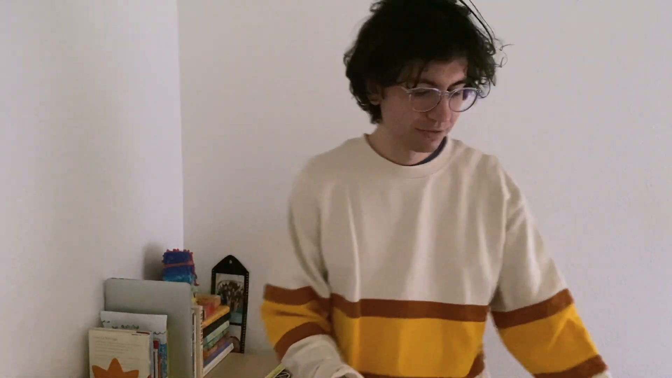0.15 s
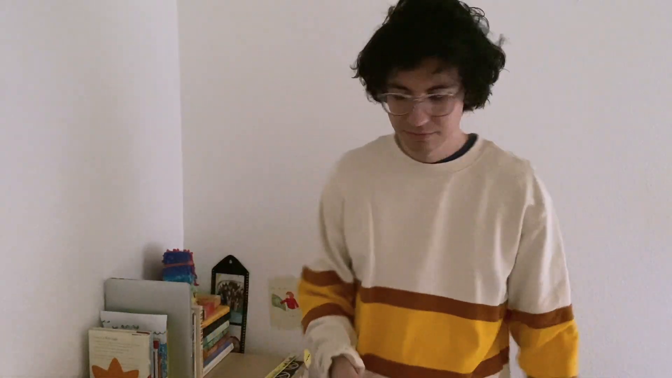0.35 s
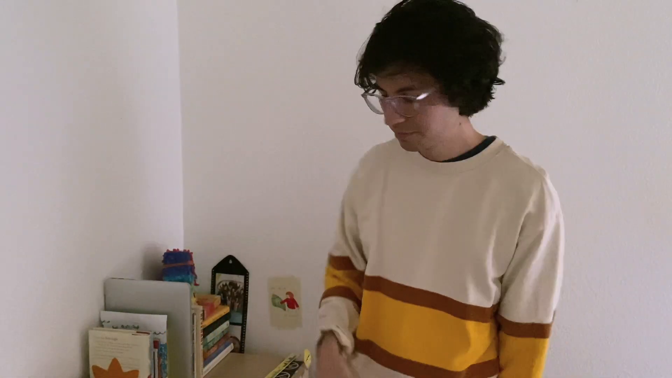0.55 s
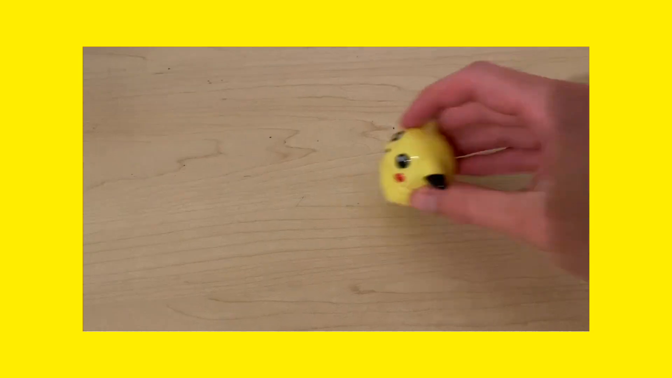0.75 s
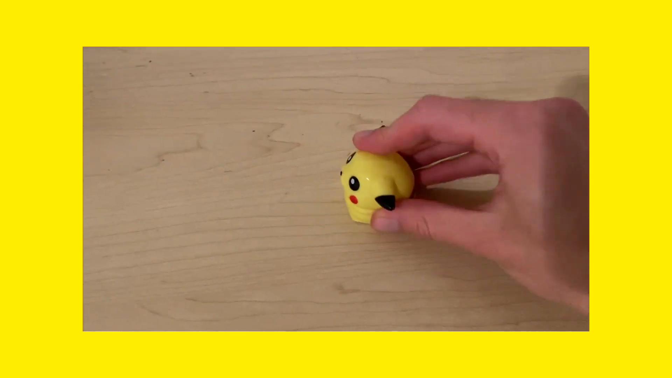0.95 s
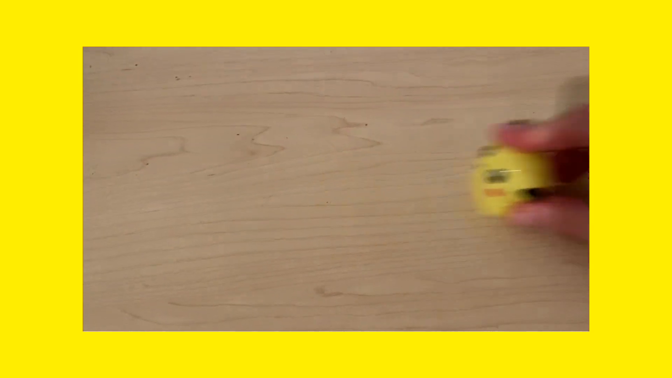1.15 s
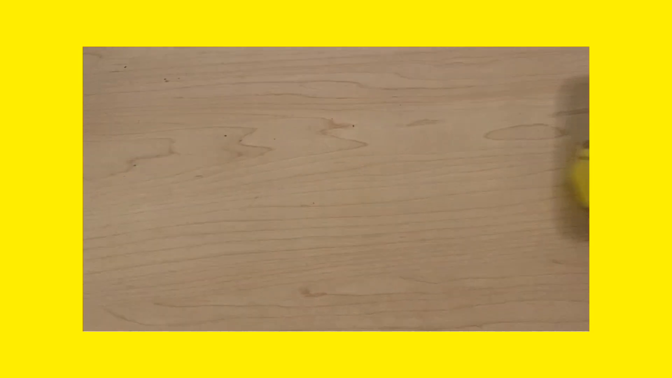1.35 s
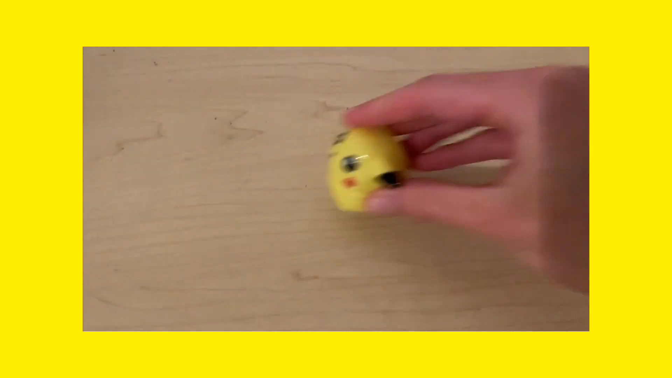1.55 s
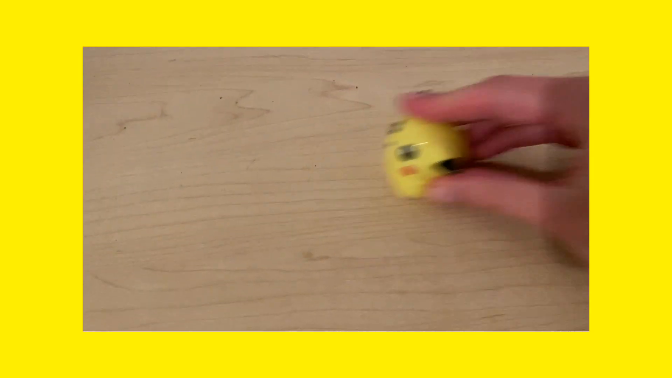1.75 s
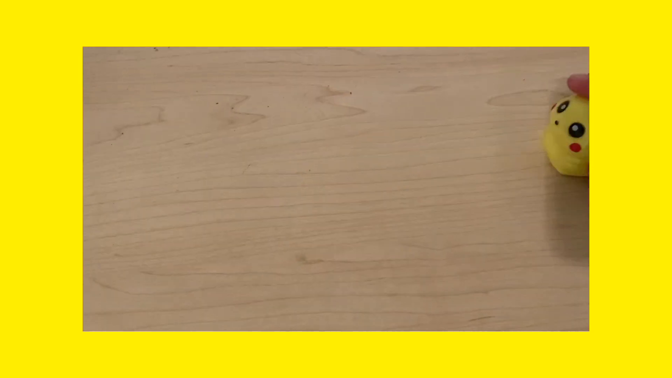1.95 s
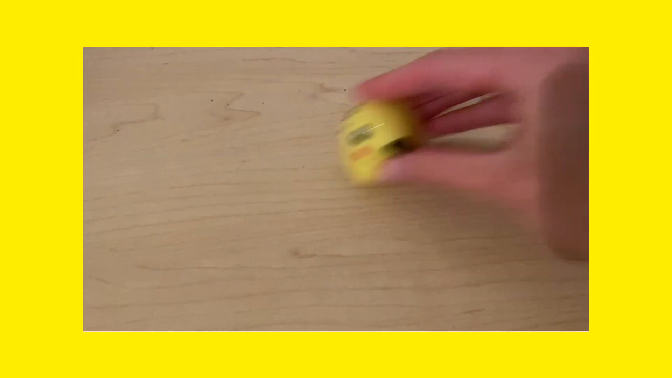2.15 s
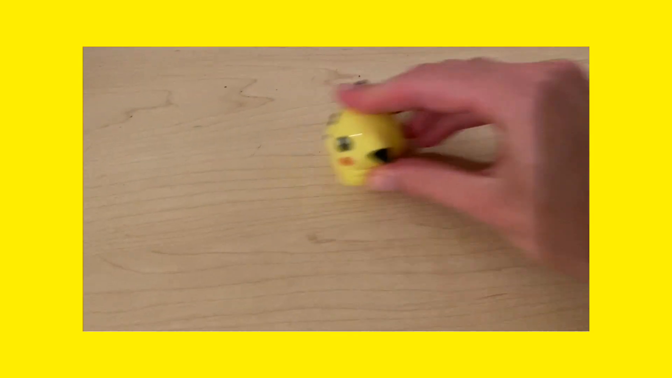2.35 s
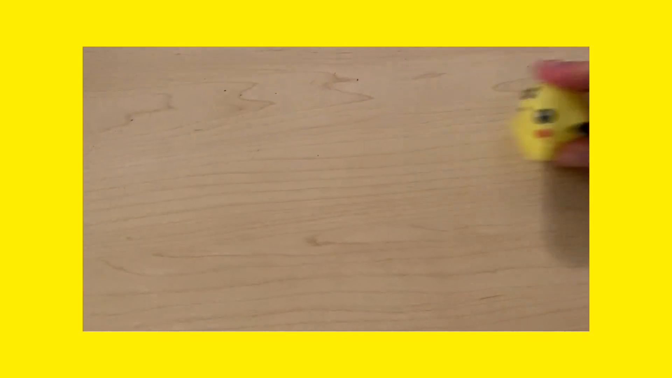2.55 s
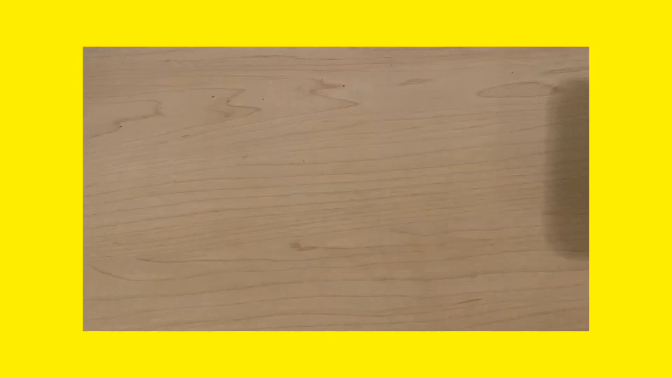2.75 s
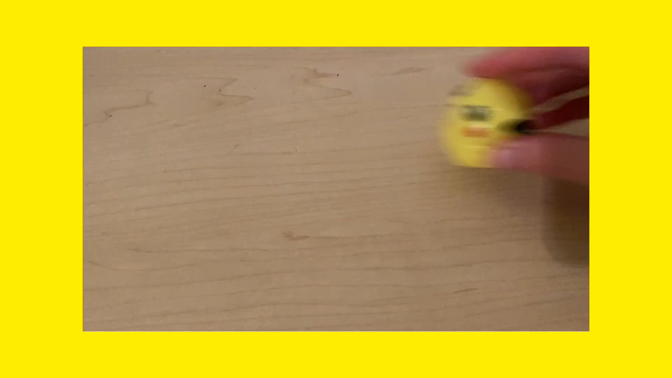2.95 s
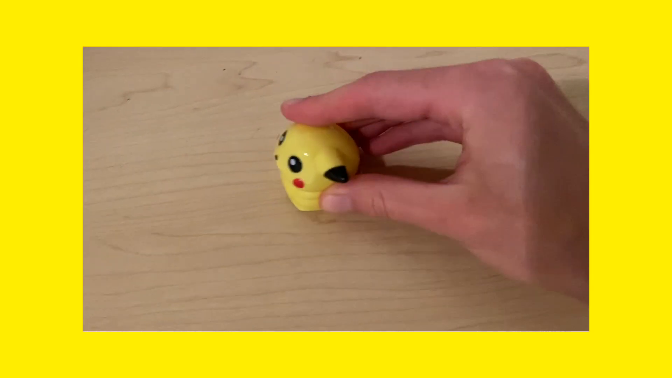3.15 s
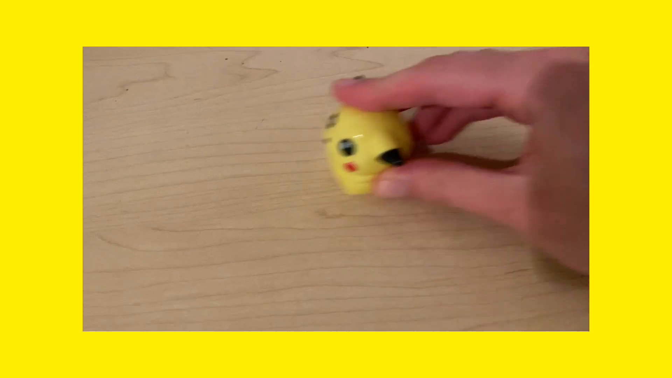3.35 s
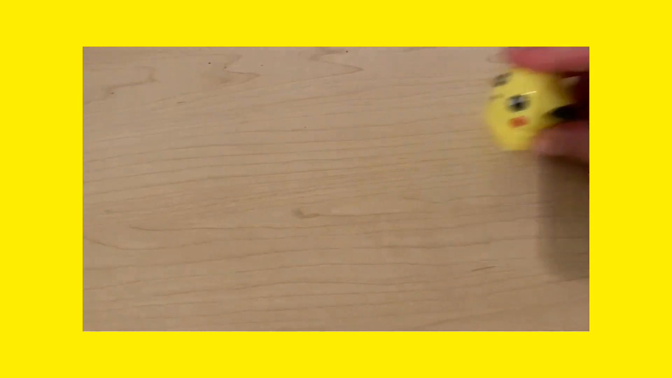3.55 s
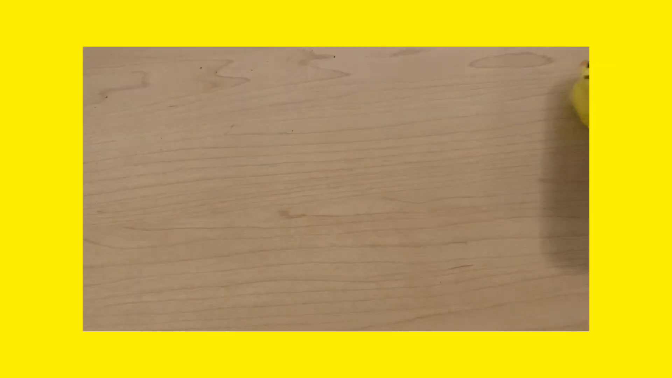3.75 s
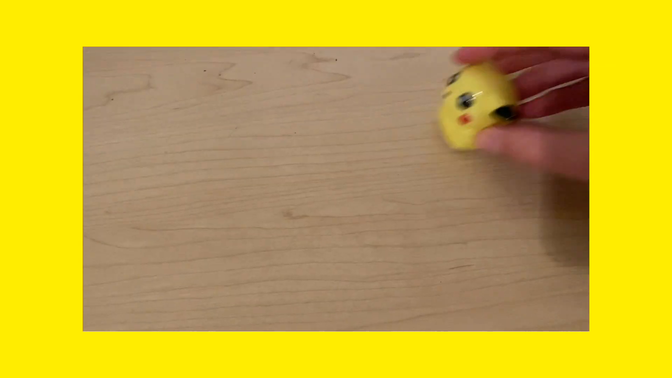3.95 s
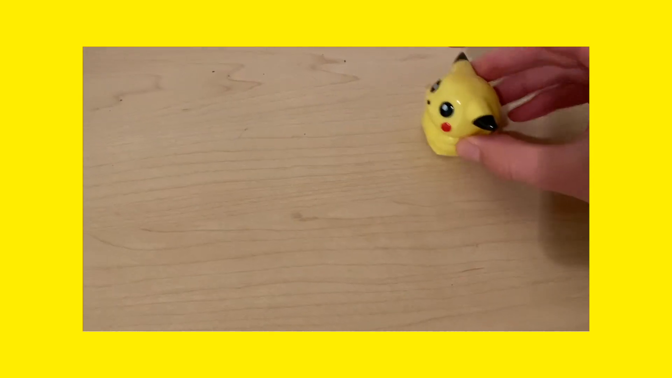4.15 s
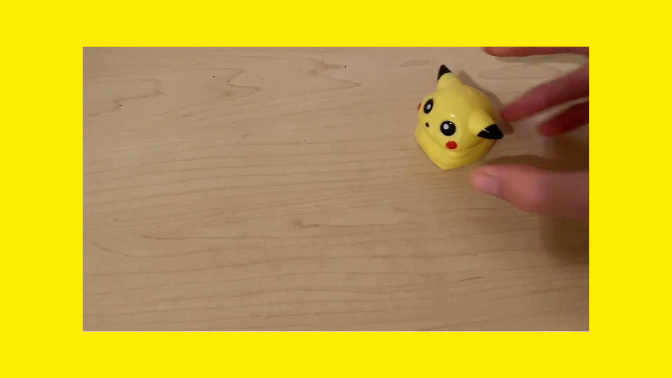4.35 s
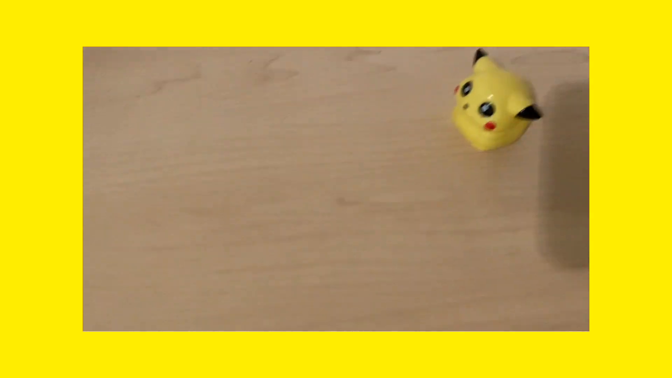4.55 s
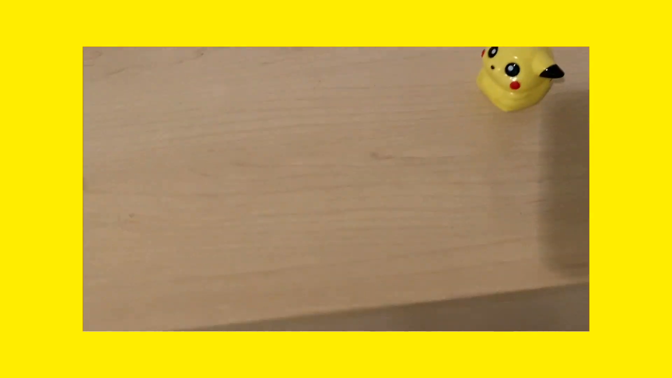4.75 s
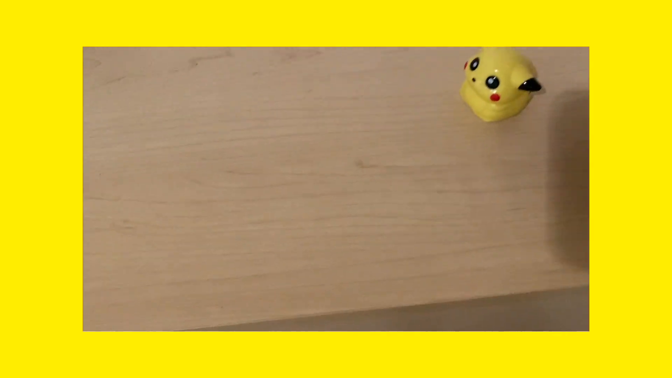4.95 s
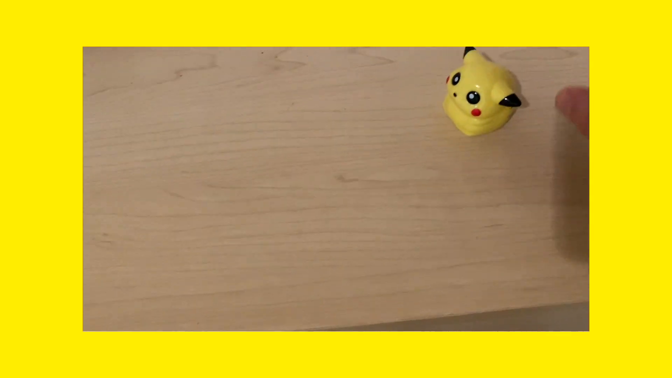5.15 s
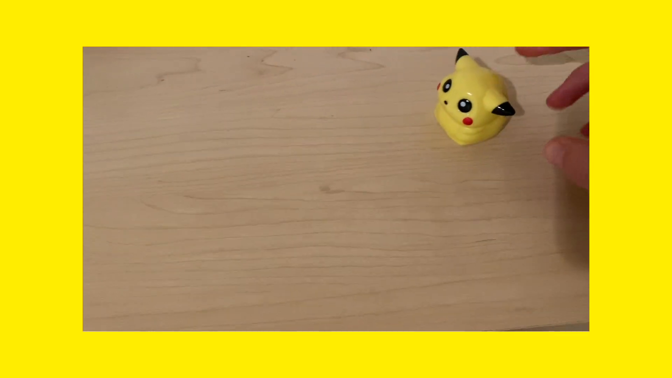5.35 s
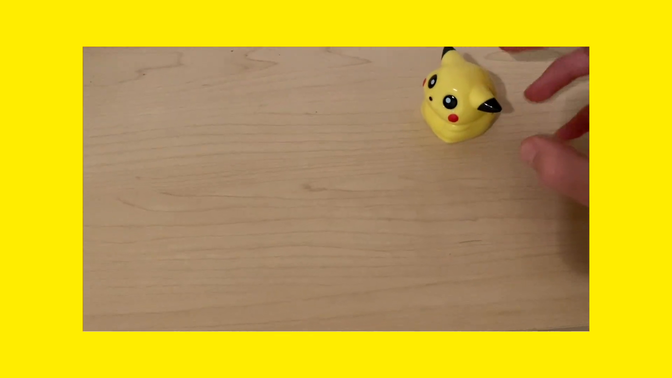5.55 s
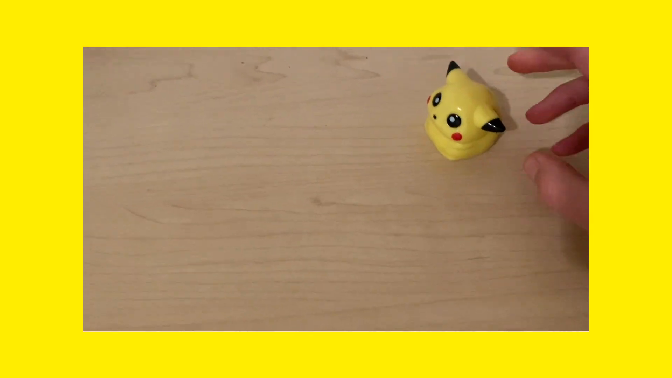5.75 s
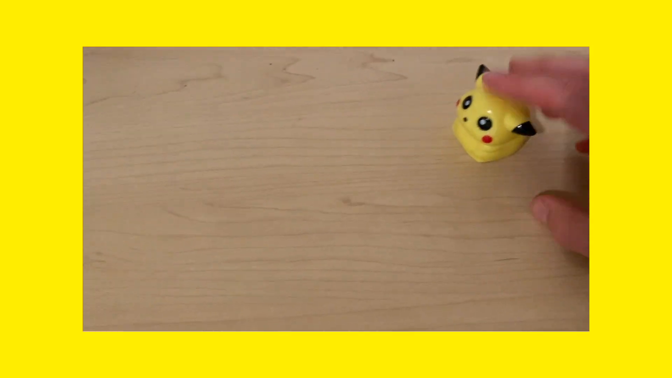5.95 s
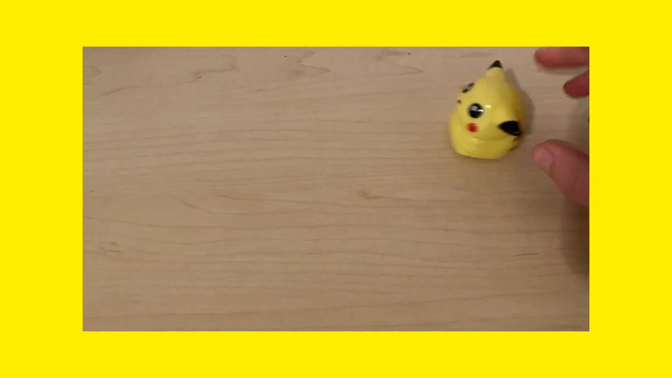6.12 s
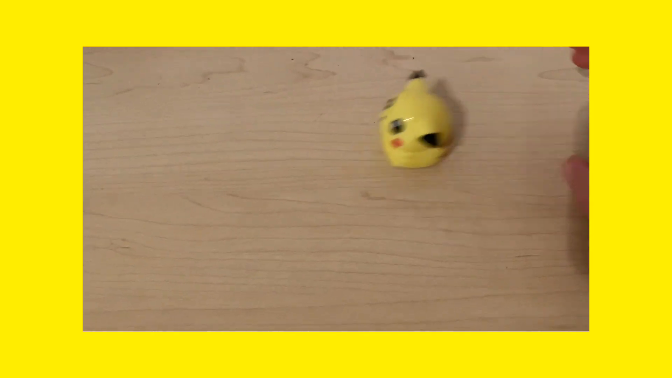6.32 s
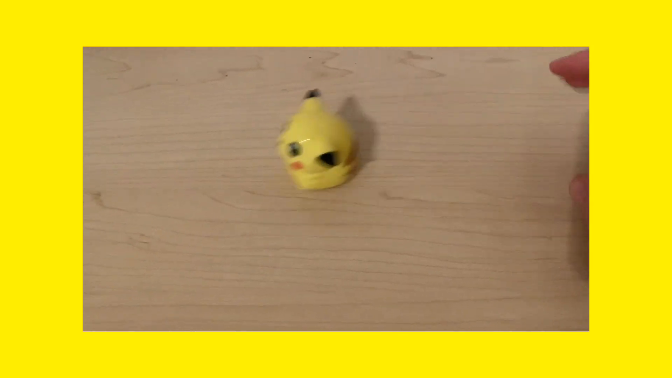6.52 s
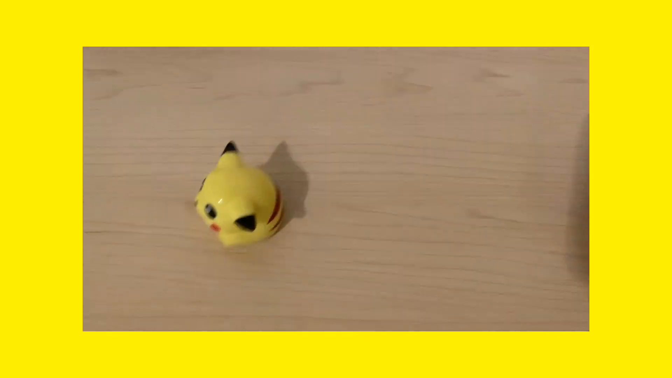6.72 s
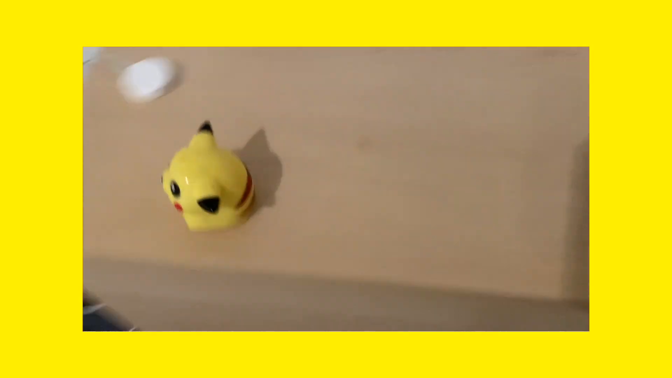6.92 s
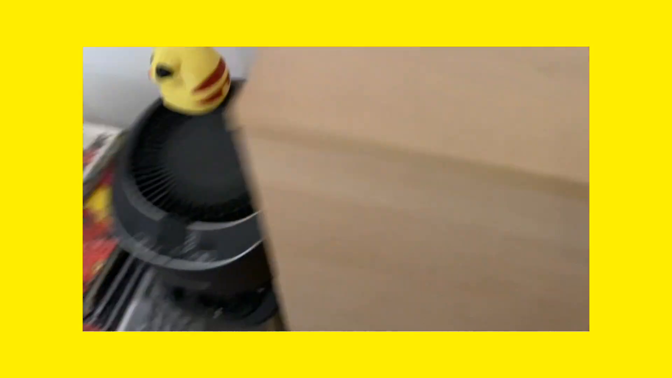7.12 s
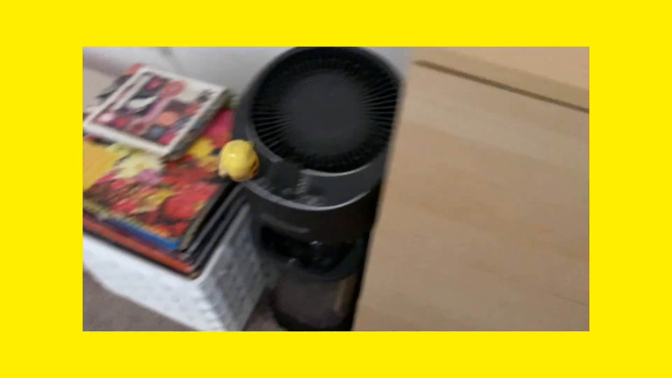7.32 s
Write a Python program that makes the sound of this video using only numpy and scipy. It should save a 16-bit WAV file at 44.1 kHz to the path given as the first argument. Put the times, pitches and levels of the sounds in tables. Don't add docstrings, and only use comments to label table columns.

```python
import sys
import numpy as np
from scipy import signal
from scipy.fft import rfft, irfft, next_fast_len
from scipy.io import wavfile

SR = 44100
rng = np.random.default_rng(int(sys.argv[2]) if len(sys.argv) > 2 else 0)


def int16_out(signal):
    q = np.round(np.clip(np.atleast_2d(signal).T, -1, 1) * 32767)
    wavfile.write(sys.argv[1], SR, q.astype(np.int16))


def how_loud(loudness_db):
    steps = np.asarray(loudness_db, float) / 20
    return 10 ** steps


N = 330055

# time [s], level [dB].
BACKGROUND = [(0, -55), (0.72, -50.5), (0.735, -105), (0.86, -97), (0.9, -70), (1.0, -69), (1.6, -71),
              (1.7, -63), (2.6, -66), (4.4, -61.5), (6.9, -59), (7.49, -59)]
# frequency [Hz], density [dB per Hz].
ROOM_TONE = [(90, -36), (150, -13), (225, -25.5), (324, 3), (430, -15.5), (545, -1), (680, -23.5),
             (1500, -26.5), (15000, -62.5)]
# frequency [Hz], time to fall 60 dB [s].
ROOM_T60 = [(100, 0.47), (1000, 0.29), (5000, 0.28), (15000, 0.044)]
# time [s], level [dB].
THUMPS = [(0.888, -50), (1.631, -42), (2.212, -32), (3.121, -40), (4.199, -34.5), (4.36, -40.5),
          (5.68, -51), (6.008, -41), (6.195, -50), (6.374, -33)]
# frequency [Hz], width [Hz], level [dB].
BOOM = [(51.4, 13, 7), (86.9, 50, -1), (115, 54.4, -1)]
DESK = [(217, 16, -4), (414, 31, -14.5), (565, 27, 1.5), (703, 53.6, -3), (799, 48, -4), (986, 200, -8)]
PILE = [(197, 54, 2.5), (348, 126, 1), (491, 57, -0.5), (650, 70, 7), (837, 830, -4)]
# start [s], end [s], desk rumble [dB], wheels [dB], gear and skin hiss [dB].
SLIDES = [(0.547, 0.547, -53, -32.5, -39.5), (1.143, 1.265, -67, -49, -52.5),
          (1.811, 1.943, -52.5, -43, -55.5), (2.394, 2.655, -51, -44, -46.5), (2.686, 2.783, -51, -49, -43),
          (3.394, 3.458, -49, -43, -50), (3.483, 3.637, -47.5, -37, -47), (3.662, 3.728, -45.5, -54, -39),
          (4.479, 4.632, -62.5, -61.5, -71), (4.637, 4.839, -79, -68, -77.5), (6.103, 6.242, -36, -35, -43),
          (6.365, 6.48, -39.5, -39, -51), (6.56, 6.886, -47, -38.5, -65), (6.87, 7.114, -45, -39, -43),
          (7.44, 7.49, -47, -36.5, -40)]
# time [s], desk rumble [dB], wheels [dB], hiss [dB].
SHUDDERS = [(0.002, -39, -70, -79), (0.351, -45, -49, -57.5), (0.43, -55, -61, -84), (0.495, -44, -50, -70),
            (0.89, -70, -59, -57.5), (1.33, -55, -72, -53.5), (1.655, -40.5, -42, -48),
            (1.76, -44, -56, -72), (2.04, -68, -60.5, -47.5), (2.24, -40, -50, -57.5),
            (2.89, -53, -55, -53), (3.155, -38, -45.5, -50.5), (3.838, -73, -61, -68),
            (4.04, -47.5, -53.5, -69), (4.235, -40, -44.5, -47.5), (4.39, -37, -38, -60),
            (5.694, -33, -45, -81), (6.03, -33, -54, -68), (7.37, -53, -32.5, -43)]
# frequency [Hz], width [Hz], level [dB].
WHEELS = [(226, 57, -3.5), (605, 73, -0.5), (853, 525, 0.5), (918, 273, 3)]
FREE_WHEELS = [(225, 86, 2.5), (430, 190, -3), (720, 440, -20)]
# frequency [Hz], density [dB per Hz].
HISS = [(1200, -14.5), (2000, -6), (4000, -8), (6300, -9), (7400, -6), (12500, -15), (15300, -11.5),
        (16200, -33.5), (17000, -65)]
TREBLE = [(3500, -30), (4800, -1.5), (6300, -3.5), (7300, 1.5), (9000, 1), (12500, -5.5), (15300, 1),
          (16300, -22.5), (16900, -57)]
PAWL_TREBLE = [(3500, -28), (4800, -6), (7300, -2.5), (9000, 1.5), (12500, -7), (15300, 3.5), (16300, -7),
               (16900, -50)]
# start [s], end [s], level [dB], frequency [Hz], width [Hz].
HUMS = [(1.055, 1.11, -62, 840, 240), (1.134, 1.2, -52.5, 790, 170), (1.19, 1.237, -59, 1040, 220),
        (1.666, 1.697, -58, 830, 390), (1.748, 1.789, -49, 850, 160), (2.876, 2.924, -49, 1200, 150),
        (3.49, 3.497, -41, 850, 180), (3.812, 3.838, -50.5, 1230, 170), (4.068, 4.09, -53.5, 1150, 190),
        (6.812, 6.821, -46, 2000, 190), (6.773, 6.875, -54, 1000, 130), (6.932, 7.065, -50, 1090, 110),
        (7.14, 7.218, -59.5, 1400, 190), (6.53, 6.58, -44.5, 1060, 130), (1.387, 1.408, -61, 1230, 310),
        (2.723, 2.805, -59, 2200, 200), (.525, .58, -49.5, 350, 260), (0.49, .59, -54, 1300, 400),
        (1.63, 1.68, -52, 680, 160), (6.38, 6.5, -56, 1175, 130)]
# time [s], treble [dB], shell [dB], support [dB].
KNOCKS = [(0.4867, -50, -40, -44), (0.5202, -46, -52, -33.5), (0.879, -38, -36, -47),
          (1.0044, -69, -74, -55), (1.3866, -36, -60, -59), (1.6221, -17.5, -24, -27),
          (1.759, -46, -70, -44), (2.2034, -24, -31, -58), (2.2244, -27.5, -72, -40),
          (2.7871, -33.5, -67.5, -77), (2.853, -31, -49, -49.5), (3.1202, -10, -16, -27.5),
          (3.326, -27.5, -45, -58.5), (3.359, -37, -65, -71), (3.404, -33, -62.5, -44.5),
          (3.8388, -24, -35, -64), (4.216, -33, -31, -34), (4.3537, -29, -20.5, -29),
          (4.3696, -43, -28, -35), (4.3807, -36.5, -27.5, -40), (4.4237, -44.5, -30, -43),
          (5.6344, -61, -55, -61), (5.6781, -42.5, -36.5, -41.5), (5.7067, -64, -47.5, -45),
          (5.7306, -45, -48, -41), (5.7558, -47, -46, -52.5)]
FALL = [(7.355, -13.5, -20, -16)]
# time [s], level [dB].
FIDGETS = [(3.313, -57), (3.372, -38), (3.391, -49), (3.417, -41.5), (3.461, -41.5), (2.752, -39)]
CLACK = [(4.3542, -22.5), (4.3708, -43.5)]
# frequency [Hz], width [Hz], level [dB].
LATCH = [(2760, 160, 0.067), (3300, 120, 0.93)]
PAWL = [(11000, 4000, 0.054), (14400, 2500, 2)]
SPUN_GEARBOX = [(2930, 1100, -2), (3740, 530, 4), (4640, 190, -41)]
WOUND_GEARBOX = [(1340, 420, 2.5), (2020, 210, 4), (2340, 70, 2), (2833, 180, 5.3), (3460, 300, 5.1),
                 (4375, 330, 5.7)]
LOOSE_GEARBOX = [(3320, 330, -6), (3620, 70, 7), (4440, 1800, -3.5)]
HELD_SHELL = [(1436, 210, 1)]
ROLLING_SHELL = [(1072, 207, 8.5), (1205, 330, 0.5), (1563, 160, -13)]
# first tooth [s], last tooth [s], whir [dB].
SPINS = [(0.72, 0.8667, -66), (1.407, 1.615, -67), (2.0588, 2.17, -47.5), (2.932, 3.104, -40.5),
         (4.113, 4.1964, -31.5), (7.38, 7.4803, -30)]
# time [s], shell [dB], treble [dB], shell pitch [Hz].
TEETH = [(0.7502, -54, -58, 1340), (0.7682, -51, -54.5, 1450), (0.7871, -48, -53.5, 1410),
         (0.8066, -46, -51, 1440), (0.8258, -45.5, -48.5, 1310), (0.8475, -43, -50, 1340),
         (0.8678, -45, -46.5, 1230), (1.4114, -28, -34, 1310), (1.4316, -23, -29, 1366),
         (1.4493, -29, -30.5, 1350), (1.468, -22.5, -30.5, 1370), (1.4865, -27.5, -31.5, 1360),
         (1.503, -28.5, -30.5, 1300), (1.5219, -25, -34, 1415), (1.5396, -27, -29, 1360),
         (1.5579, -28.5, -33.5, 1390), (1.5754, -27, -31, 1340), (1.5943, -27.5, -30, 1340),
         (1.6121, -29, -31, 1310), (2.0589, -23, -29, 1295), (2.0777, -20.5, -27.5, 1360),
         (2.0963, -22.5, -28, 1370), (2.1135, -19.5, -24.5, 1366), (2.1324, -22, -27.5, 1380),
         (2.15, -20.5, -27, 1370), (2.168, -22.5, -27, 1355), (2.1861, -23.5, -27.5, 1270),
         (2.9311, -20, -25, 1290), (2.9499, -18.5, -23, 1340), (2.968, -19.5, -22, 1390),
         (2.9856, -19, -25.5, 1390), (3.0045, -20.5, -21, 1360), (3.023, -20, -24, 1490),
         (3.041, -16.5, -22, 1370), (3.0604, -18, -23.5, 1310), (3.0796, -17.5, -24, 1340),
         (3.0989, -24, -21.5, 1300), (4.1217, -13.5, -22.5, 1260), (4.14, -23, -20.5, 1330),
         (4.1584, -16.5, -21, 1240), (4.1781, -14.5, -22, 1230), (4.1963, -23.5, -26.5, 1120),
         (7.39, -25, -26, 1430), (7.4138, -30, -24.5, 1240), (7.437, -28.5, -24, 1490),
         (7.457, -30, -25.5, 1500), (7.4774, -32, -22, 1340)]
LONE_TEETH = [(4.344, -33, -47, 1150), (2.036, -45, -60.5, 1270), (2.9023, -43, -38.5, 1188),
              (2.9163, -40.5, -37.5, 1180), (4.0198, -35.5, -36.5, 1150), (4.0891, -32, -40, 1110),
              (4.0986, -21.5, -29, 1176), (7.1347, -30.5, -40.5, 1340)]
# time [s], treble [dB], gearbox [dB against treble], snap [dB against treble], favoured ring [Hz].
SLIPS = [(1.2489, -18.5, -16.5, -5, 2360), (1.2634, -22.5, -15.5, -8, 2050), (1.2883, -25, -12, 2, 2390),
         (1.8445, -18, -15, 3, 3340), (1.8695, -20, -10.5, 1, 2080), (1.8877, -24, -12, 2, 2800),
         (1.9096, -18, -12.5, -5, 2270), (1.943, -17.5, -14.5, 0, 2310), (2.4708, -13.5, -12.5, 0, 3130),
         (2.4905, -16.5, -14, -3, 2810), (2.5157, -18.5, -7.5, 5.5, 3100), (2.541, -16, -12.5, 5, 2040),
         (2.5668, -12.5, -14, -0.5, 2080), (2.5859, -17, -10, -2, 2820), (2.6082, -14, -11.5, -0.5, 2350),
         (2.6312, -14, -13.5, 4, 2860), (2.657, -13, -11, -1, 2360), (2.679, -15, -13.5, -2.5, 3770),
         (2.7072, -13, -11.5, -2.5, 3530), (2.7415, -15, -14, 0, 2060), (3.5022, -10.5, -12, 1, 2790),
         (3.5209, -13.5, -10, 0.5, 4330), (3.5467, -10, -11.5, -2.5, 2790), (3.5737, -13, -11, 1.5, 2030),
         (3.6005, -9, -14, -2, 2080), (3.6197, -12.5, -13, -1.5, 2650), (3.6427, -13, -9.5, -2, 4190),
         (3.6716, -12, -11.5, 3.5, 2080), (3.711, -12, -10.5, -2.5, 2080)]
# time [s], treble [dB], gearbox [dB].
JOLTS = [(6.002, -29, -34.5), (6.085, -35.5, -36), (6.113, -13.5, -18.5), (6.1633, -26.5, -31),
         (6.2037, -22.5, -45), (6.2283, -17, -24.5), (6.252, -27, -37), (6.343, -38, -40), (6.37, -23, -53),
         (6.3897, -37, -37), (6.8023, -35, -30), (6.8865, -28, -31), (7.1305, -26.5, -33)]
# tick [s], gap to tack [s], tick [dB], tack [dB].
TURNS = [(6.416, 0.017, -29.5, -26), (6.5024, 0.023, -32, -21.5), (6.5882, 0.015, -25, -20.5),
         (6.655, 0.03, -27, -20.5), (6.738, 0.015, -27, -20), (6.8023, 0.012, -23.5, -22.5),
         (6.8572, 0.0118, -25.5, -23), (6.907, 0.0112, -25.5, -21.5), (6.958, 0.0096, -24, -24.5),
         (7.0004, 0.0122, -23, -22), (7.048, 0.011, -30, -23.5), (7.0928, 0.012, -27.5, -22)]
# time [s], shell [dB], desk [dB against shell].
HOPS = [(6.004, -36, -9), (6.086, -23.5, -12), (6.1, -24.5, -15), (6.113, -23.5, -15), (6.143, -28, -17),
        (6.165, -26, -15), (6.198, -16, -12.5), (6.217, -25.5, -5), (6.227, -18.5, -21), (6.265, -28, -8.5),
        (6.345, -34, -22), (6.37, -17.5, -11.5), (6.394, -27.5, -16), (6.414, -31, -9), (6.477, -42, -21),
        (6.496, -42, -11), (6.513, -25.5, -9.5), (6.521, -38, -9), (6.548, -41, -7), (6.6, -25, -12),
        (6.659, -35, -17), (6.677, -38.5, -6.5), (6.748, -31.5, -6.5), (6.791, -34, -20),
        (6.808, -32.5, -9.5), (6.814, -28.5, -15), (6.864, -37, -22), (6.887, -29.5, -8), (6.898, -32, -27),
        (6.919, -23, -12.5), (6.947, -40, -11), (6.995, -26.5, -10), (7.003, -37, 0), (7.015, -26.5, -7.5),
        (7.092, -36, -12), (7.102, -40, -2)]
# time [s], left minus right [dB].
PLACE = [(0.8, 5), (1.45, -3), (1.56, 6.5), (2.08, -1), (2.19, 4.5), (2.97, -3), (3.03, 5), (3.88, 1),
         (6.32, 0.5), (6.86, 9.5), (7.1, 4.5), (7.13, 14.5), (7.19, 4), (7.47, 4.5)]

SCENE_CHANGE_S, LET_GO_S = 0.73, 5.9
SLIDE_RISE, SLIDE_FALL = (450, 760, 280), (140, 186, 170)
SHUDDER_RISE, SHUDDER_FALL = (360, 1100, 900), (400, 190, 120)


def in_time(rows):
    s, *columns = np.transpose(rows)
    return [np.interp(np.arange(N) / SR, s, c) for c in columns]


def rms_one(x):
    return x / np.sqrt(np.mean(x ** 2) + 1e-20)


def at_hz(points, hz):
    table_hz, values = np.array(points)[:, 0], np.array(points)[:, 1]
    return np.interp(np.log(np.maximum(hz, 1)), np.log(table_hz), values)


def noise(alike):
    mid, side = rng.standard_normal((2, N))
    alike = np.clip(alike, 0, 1)
    return (np.sqrt(1 + alike) * mid + np.sqrt(1 - alike) * side * [[1], [-1]]) / np.sqrt(2)


def drift(rate_hz):
    r = np.exp(-2 * np.pi * rate_hz / SR)
    return rms_one(signal.lfilter([1], [1, -2 * r, r * r], rng.standard_normal(N + SR))[SR:])


def colour(x, spectrum):
    size = next_fast_len(N)
    gain = how_loud(at_hz(spectrum, np.fft.rfftfreq(size, 1 / SR)))
    return irfft(rfft(x, size) * rms_one(gain), size)[..., :N]


def resonate(x, modes):
    out, power = 0, 0
    for k, (hz, width, db) in enumerate(modes):
        r = np.exp(-np.pi * width / SR)
        poles = [1, -2 * r * np.cos(2 * np.pi * hz / SR), r * r]
        out = out + (-1) ** k * how_loud(db) * signal.lfilter([1 - r, 0, r - 1], poles, x)
        power += how_loud(2 * db) * np.pi * width / SR
    return out / np.sqrt(power)


def bursts(times, level_db, rise_s, t60):
    marks = np.full(N, 1e-18)
    marks[np.minimum((times * SR - rise_s * SR).astype(int), N - 1)] = how_loud(level_db)
    poles = np.poly([np.exp(-1 / (rise_s * SR))] * 2 + [how_loud(-60 / (t60 * SR))])
    one = signal.lfilter([1], poles, np.r_[1, np.zeros(SR // 20)])
    return signal.lfilter([1], poles, marks) / one.max()


def crack(s, level_db, rise_s, t60, spectrum=TREBLE):
    return colour(bursts(s, level_db, rise_s, t60) * noise(alike=0.024), spectrum)


def chatter(s, level_db, modes, rise_s, t60, alike):
    return resonate(bursts(s, level_db, rise_s, t60) * noise(alike), modes)


def strike(s, level_db, modes, soft, lag_s):
    clicks = 1e-12 * np.cos(np.arange(2 * N)).reshape(2, N)
    off_time = s + lag_s * rng.standard_normal(len(s))
    for side, when in enumerate((s, off_time)):
        clicks[side, np.minimum((when * SR).astype(int), N - 1)] = how_loud(level_db)
    one = resonate(resonate(np.r_[1, np.zeros(SR // 10)], modes), soft)
    return resonate(resonate(clicks, modes), soft) / np.abs(one).max()


def pops(s, level_db, pitch_hz, swell_s):
    out, t = np.zeros((2, N + SR)), np.arange(SR // 40) / SR
    shape = t / swell_s * np.exp(1 - t / swell_s)
    for when, db, hz, turn in zip(s, level_db, pitch_hz, rng.standard_normal(len(s))):
        at = int(when * SR)
        phase = (0.25 + 0.15 * turn) * np.array([[1], [-1]])
        out[:, at:at + len(t)] += how_loud(db) * shape * np.sin(2 * np.pi * hz * t + phase)
    return out[:, :N]


def swells(start, end, level_db, rise_db_s, fall_db_s):
    t, power = np.arange(0, N + 32, 32) / SR, 0
    for a, b, db in zip(start, end, level_db):
        loss_db = rise_db_s * np.maximum(a - t, 0) + fall_db_s * np.maximum(t - b, 0)
        same_scene = (a < SCENE_CHANGE_S) == (t < SCENE_CHANGE_S)
        power = power + how_loud(2 * (db - loss_db)) * same_scene
    return np.interp(np.arange(N) / SR, t, power)


def levels():
    start, end, *slide_db = np.transpose(SLIDES)
    s, *shudder_db = np.transpose(SHUDDERS)
    rumble, roll, hiss = (swells(start, end, slide_db[k], SLIDE_RISE[k], SLIDE_FALL[k])
                          + swells(s, s, shudder_db[k], SHUDDER_RISE[k], SHUDDER_FALL[k]) for k in range(3))
    first, last, whir_db = np.transpose(SPINS)
    whir = swells(last, last, whir_db, rise_db_s=68, fall_db_s=300.5)
    t = np.arange(N) / SR
    whir *= sum((t > a) & (t < a + .6) for a in first) > 0
    rumble += how_loud(2 * in_time(BACKGROUND)[0])
    hiss_floor_db = -80.5
    return [10 * np.log10(p + 1e-12) for p in (rumble, roll, hiss + whir + how_loud(2 * hiss_floor_db))]


def room_tone():
    tone_db = -63 + 0.95 * (in_time(BACKGROUND)[0] + 50)
    return how_loud(tone_db) * rms_one(colour(noise(alike=0.34), ROOM_TONE))


def room(x):
    t = np.arange(SR // 2) / SR
    echo, edges = 0, 100 * 2. ** np.arange(8)
    for low, high in zip(edges, np.minimum(2 * edges, .45 * SR)):
        octave = signal.butter(2, [low, high], "band", fs=SR, output="sos")
        band = signal.sosfilt(octave, rng.standard_normal((2, len(t))))
        echo = echo + band * how_loud(-60 * t / at_hz(ROOM_T60, np.sqrt(low * high)))
    echo *= np.clip(t / 0.02, 0, 1)
    return signal.fftconvolve(x, echo / np.sqrt(np.sum(echo ** 2) / 2), axes=1)[:, :N]


def boom(rumble_db):
    thumps = strike(*np.transpose(THUMPS), BOOM, [(88.2, 550, 0)], lag_s=.0001)
    rumble = resonate(resonate(noise(alike=0.47), BOOM), [(74, 121, 0)])
    return thumps + how_loud(rumble_db) * rms_one(rumble)


def rolling(roll_db):
    bumps = noise(alike=.5) * how_loud(2.5 * drift(60))
    free = np.arange(N) > LET_GO_S * SR
    held_wheels = rms_one(resonate(bumps, WHEELS))
    free_wheels = .5 * rms_one(resonate(bumps, FREE_WHEELS))
    shell = rms_one(resonate(bumps, ROLLING_SHELL) + 0.28 * resonate(bumps, LOOSE_GEARBOX))
    return how_loud(roll_db - 7.5) * (np.where(free, free_wheels, held_wheels) + 0.9 * free * shell)


def rubbing(hiss_db):
    hiss = colour(noise(alike=.4) * how_loud(1.5 * drift(80)), HISS)
    return how_loud(hiss_db - 7.5) * rms_one(hiss)


def motion():
    rumble_db, roll_db, hiss_db = levels()
    return boom(rumble_db) + room_tone() + rolling(roll_db) + rubbing(hiss_db)


def hums():
    out = np.zeros((2, N))
    for start, end, db, hz, width in HUMS:
        a, b = int((start - .05) * SR), int((end + .05) * SR)
        t = np.arange(a, b) / SR
        rub = resonate(rng.standard_normal(SR // 2), [(hz, width, 0)])
        rub = resonate(rub, [(hz, 3 * width, 0)])
        edge_s = np.maximum(start - t, 0) + .5 * np.maximum(t - end, 0)
        out[:, a:b] += how_loud(db) * np.exp(-edge_s / 0.0046) * rms_one(rub)[-len(t):]
    return out


def earlier_slip():
    return chatter(np.array([.001]), -60, [(2170, 480, 0)], rise_s=.001, t60=0.33, alike=0.19)


def knocks(table, wood, crack_t60, push_t60):
    s, treble_db, shell_db, wood_db = np.transpose(table)
    gear_db = (treble_db + shell_db) / 2 - 12
    out = crack(s, treble_db - 6.5, rise_s=0.00017, t60=crack_t60)
    out += chatter(s, gear_db, WOUND_GEARBOX[1:-1], rise_s=0.00075, t60=crack_t60, alike=0.43)
    out += chatter(s, shell_db + 3.1, ROLLING_SHELL, rise_s=.0005, t60=push_t60, alike=.8)
    return out + chatter(s, wood_db + 1.5, wood, rise_s=0.00037, t60=2.8 * push_t60, alike=0.97)


def touches():
    desk = knocks(KNOCKS, DESK, crack_t60=0.021, push_t60=0.017)
    pile = knocks(FALL, PILE, crack_t60=0.04, push_t60=0.057)
    latch = chatter(*np.transpose(CLACK), LATCH, rise_s=0.000463, t60=0.012, alike=0.79)
    fingers = crack(*np.transpose(FIDGETS), rise_s=.0003, t60=0.01205)
    return desk + pile + latch + fingers


def spin():
    s, shell_db, treble_db, shell_hz = np.transpose(list(TEETH) + list(LONE_TEETH))
    out = pops(s, shell_db + 2.2, shell_hz, swell_s=0.00115)
    out += chatter(s, shell_db - 20, HELD_SHELL, rise_s=0.0031, t60=0.028, alike=0.88)
    rasp = chatter(s, treble_db - 14.5, SPUN_GEARBOX, rise_s=0.0011, t60=0.045, alike=0.64)
    out += resonate(rasp, [(3530, 2570, 0)])
    return out + crack(s, treble_db, rise_s=0.0025, t60=0.019)


def ratchet():
    s, treble_db, gear_db, snap_db, ring_hz = np.transpose(SLIPS)
    gear_db = gear_db + treble_db
    out = chatter(s, gear_db, WOUND_GEARBOX, rise_s=0.00023, t60=0.024, alike=0.47)
    out += chatter(s, gear_db - 20.5, DESK, rise_s=0.00037, t60=0.009, alike=0.79)
    out += pops(s, gear_db, ring_hz, swell_s=0.00073)
    out += strike(s, treble_db + snap_db + 2.5, PAWL, [(12000, 9000, 0)], lag_s=.00002)
    return out + crack(s, treble_db - 7.5, rise_s=0.0002, t60=0.015, spectrum=PAWL_TREBLE)


def ticks():
    s, gap, tick_db, tack_db = np.transpose(TURNS)
    tick = [s, tick_db, tick_db - 2.5]
    tack = [s + gap, tack_db, tack_db - 12]
    return np.hstack([np.transpose(JOLTS), tick, tack])


def drive():
    s, treble_db, gear_db = ticks()
    out = crack(s, treble_db - 5, rise_s=0.0008, t60=0.021)
    out += chatter(s, gear_db - 5, LOOSE_GEARBOX, rise_s=0.00049, t60=0.027, alike=0.17)
    s, shell_db, wood_db = np.transpose(HOPS)
    wood_db = wood_db + shell_db
    out += strike(s, shell_db - 0.4, ROLLING_SHELL, [(1150, 710, 0)], lag_s=.00008)
    out += chatter(s, shell_db - 5, ROLLING_SHELL[:1], rise_s=0.0004, t60=0.04, alike=0.6)
    return out + strike(s, wood_db + 7, DESK, [(660, 690, 0)], lag_s=.0001)


def toy():
    return hums() + earlier_slip() + touches() + spin() + ratchet() + drive()


def scene():
    clicks = toy()
    near = clicks + how_loud(-15) * room(clicks) + motion()
    top = signal.sosfiltfilt(signal.butter(2, 9500, "high", fs=SR, output="sos"), near)
    body = signal.sosfiltfilt(signal.butter(1, [500, 2200], "band", fs=SR, output="sos"), near)
    sided = how_loud(in_time(PLACE)[0] / 2 * np.array([[1], [-1]])) - 1
    dulling = .5 * np.interp(np.arange(N) / SR, [6.3, 6.6], [0, 1])
    return near + sided * body - dulling * top


def low_pass(x):
    return signal.sosfilt(signal.butter(12, 16810, fs=SR, output="sos"), x)


def record(dry):
    size = next_fast_len(N)
    hz = np.fft.rfftfreq(size, 1 / SR)
    low_cut = 1 + (42 / np.maximum(hz, 1)) ** 4
    left, right = rfft(dry, size) * np.clip((16600 - hz) / 300, 0, 1) / low_cut
    apart = (left - right) / 2 / (1 + (hz / 175.7) ** 2)
    left, right = left - apart, right + apart
    shared = .93 * np.clip((hz - 5500) / 2500, 0, 1)
    right = shared * left + np.sqrt(1 - shared ** 2) * right
    one_port_hz, port_lag_s = 6350, .000263
    left = left * np.exp(-2j * np.pi * port_lag_s * np.maximum(hz - one_port_hz, 0))
    mix = irfft(np.array([left, right]), size)[:, :N]
    return low_pass(mix)


dry = scene()
out = record(dry)
int16_out(out)
```